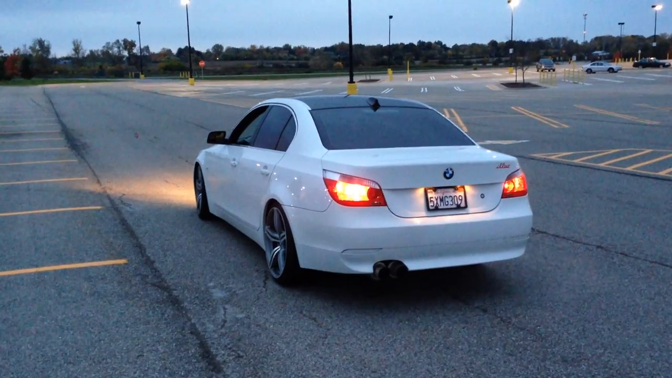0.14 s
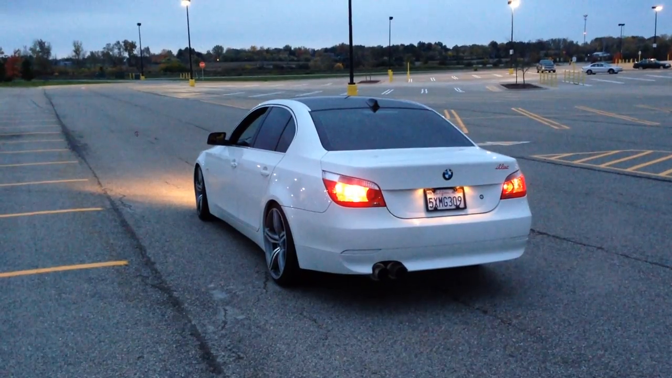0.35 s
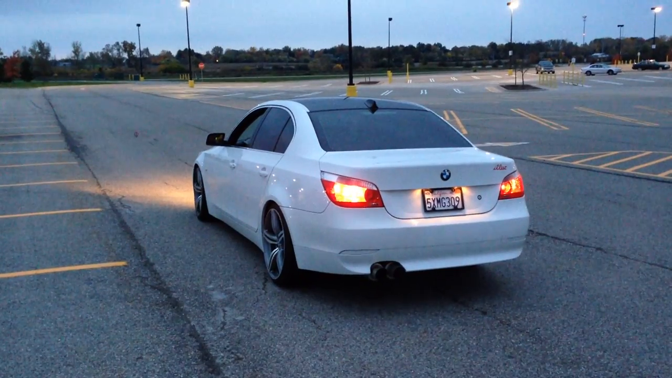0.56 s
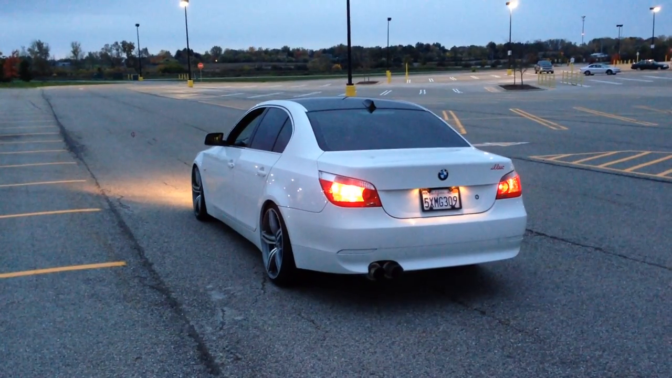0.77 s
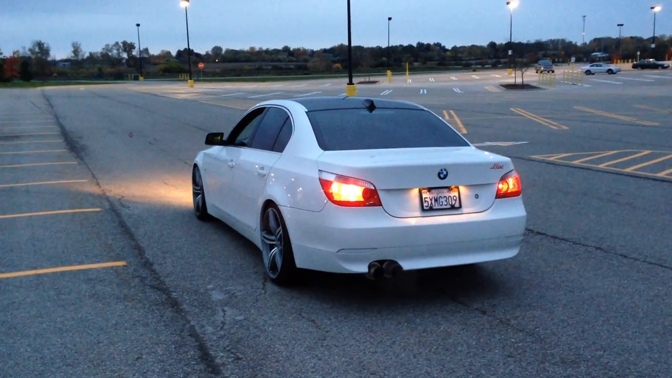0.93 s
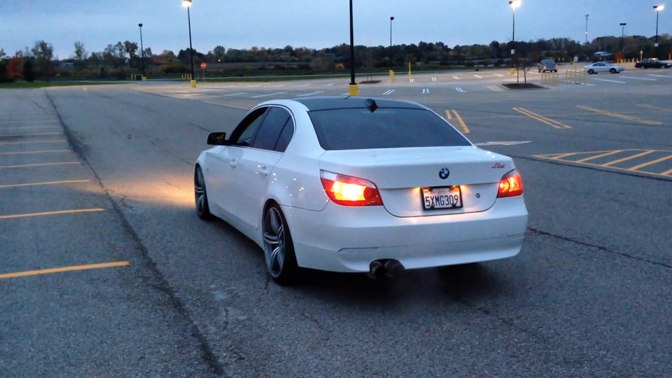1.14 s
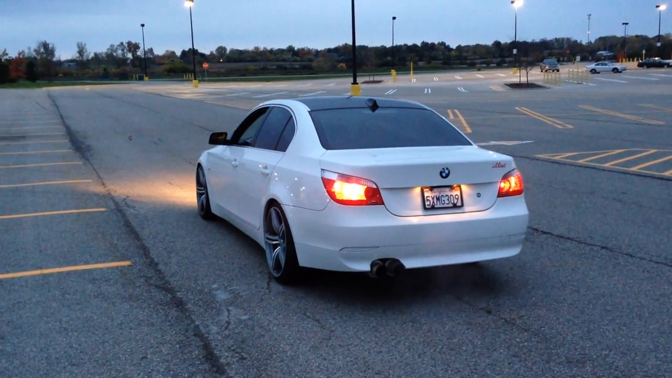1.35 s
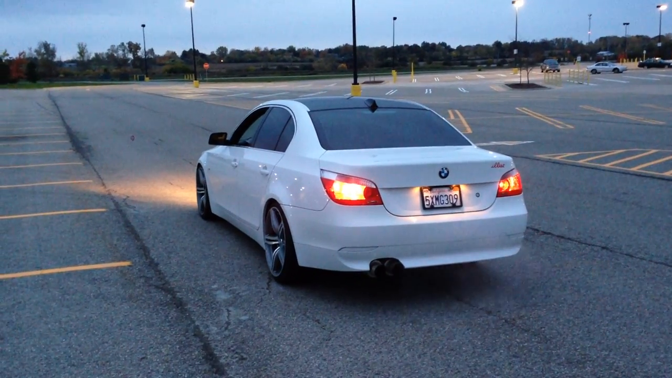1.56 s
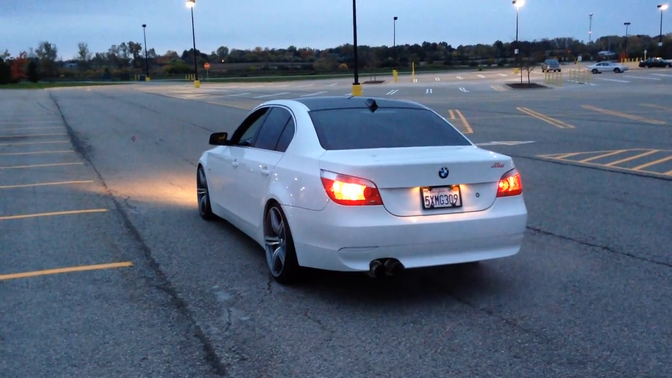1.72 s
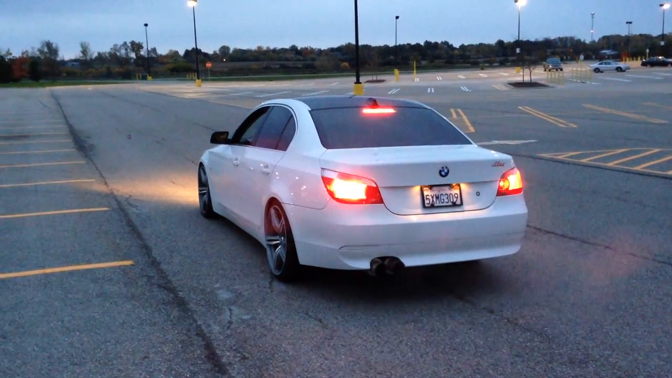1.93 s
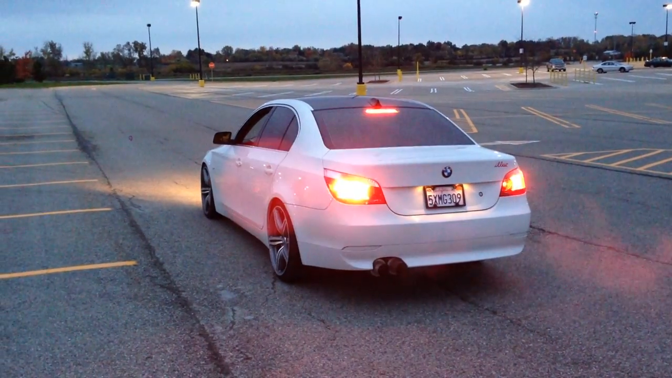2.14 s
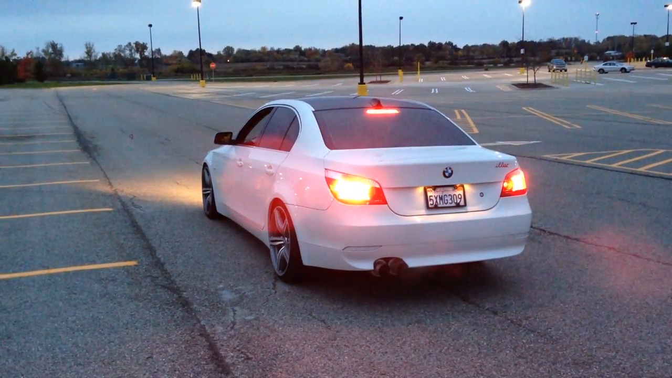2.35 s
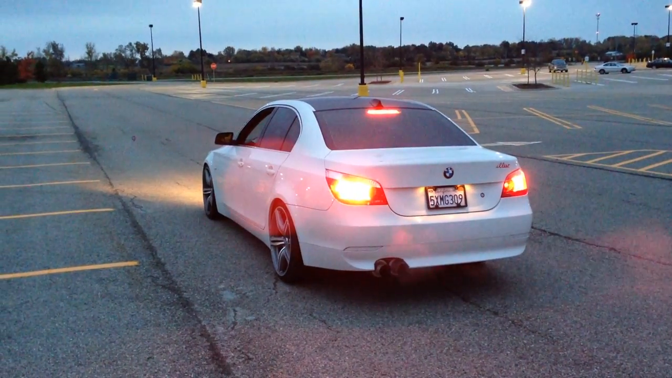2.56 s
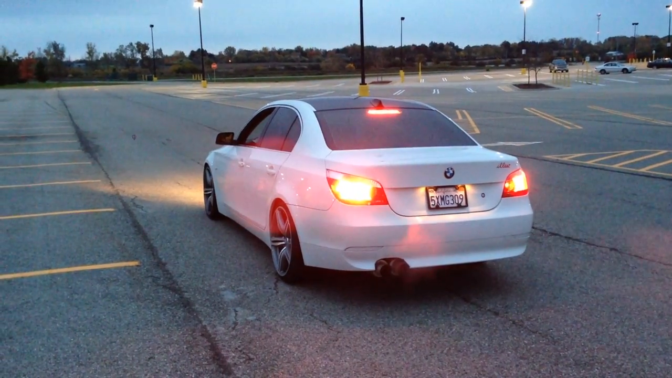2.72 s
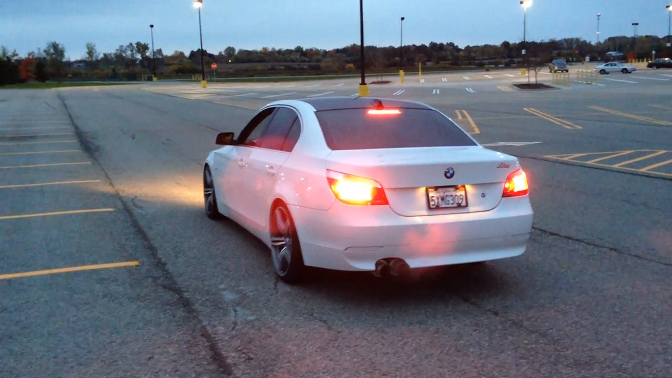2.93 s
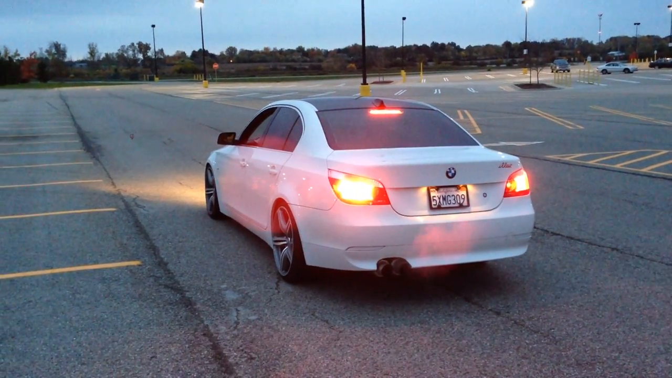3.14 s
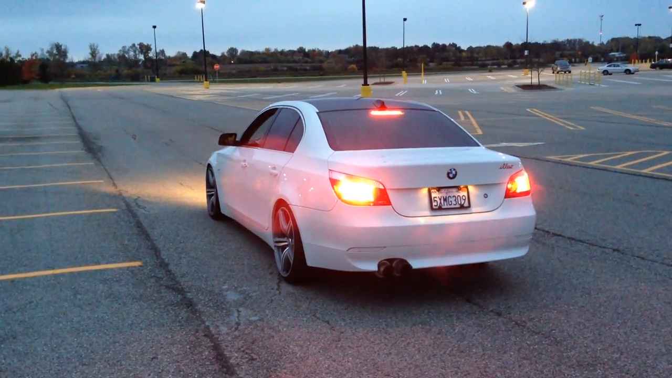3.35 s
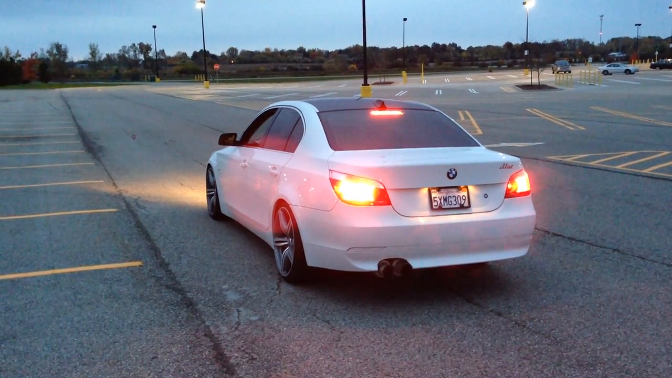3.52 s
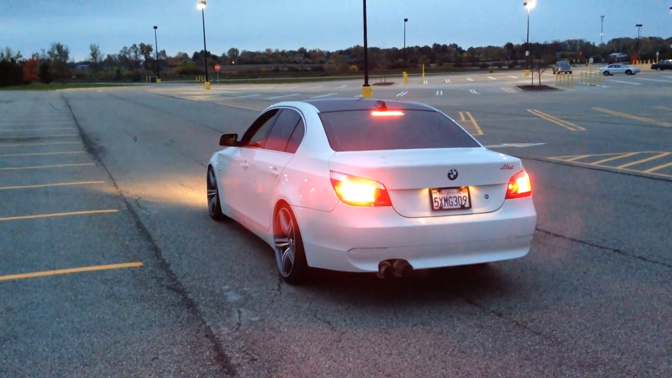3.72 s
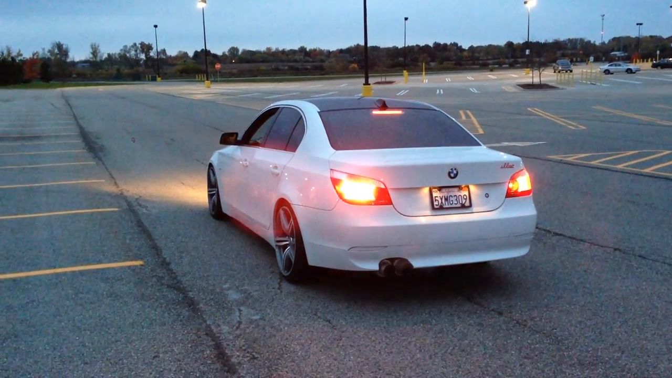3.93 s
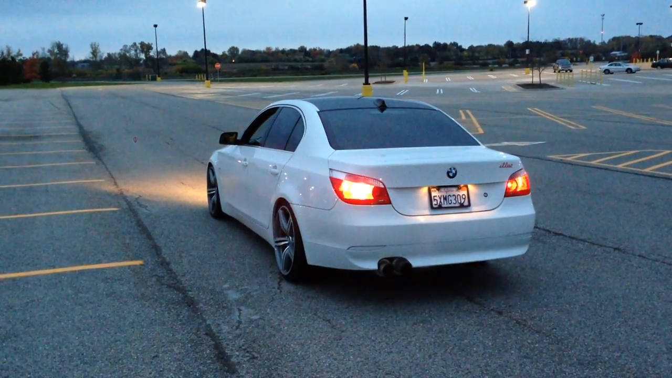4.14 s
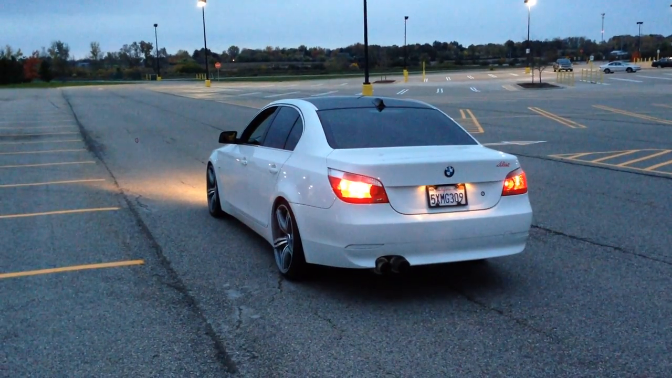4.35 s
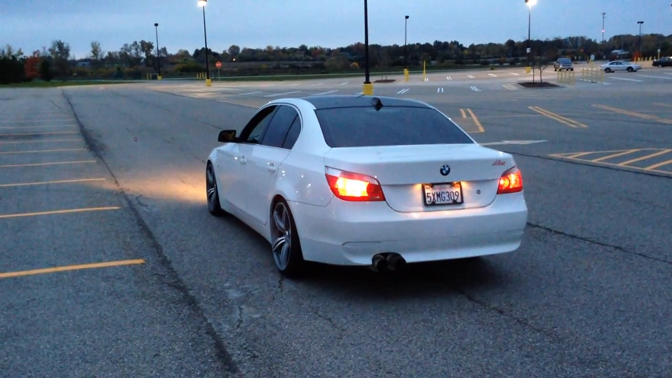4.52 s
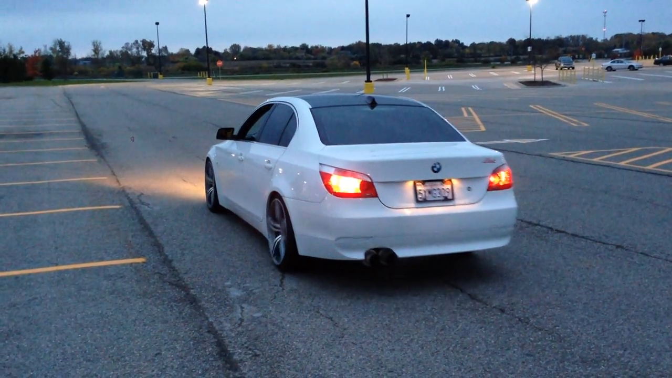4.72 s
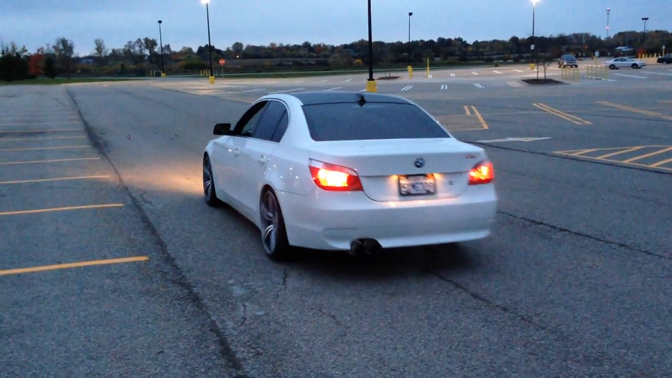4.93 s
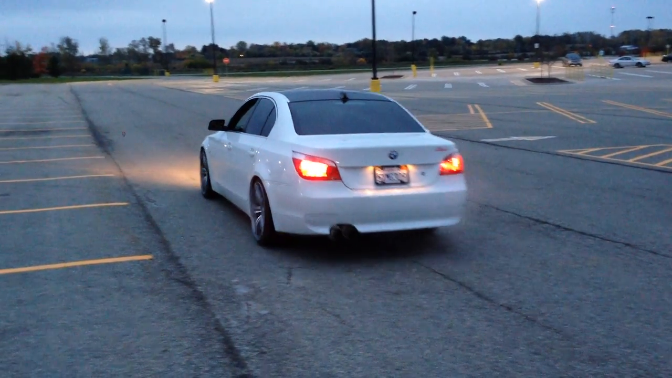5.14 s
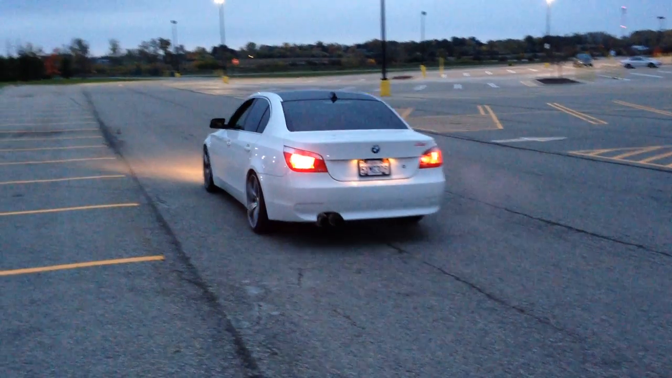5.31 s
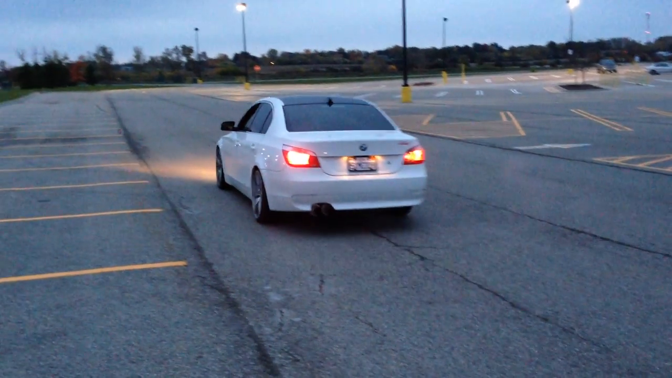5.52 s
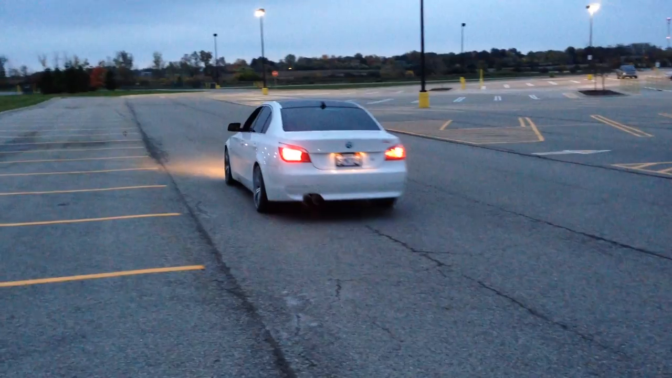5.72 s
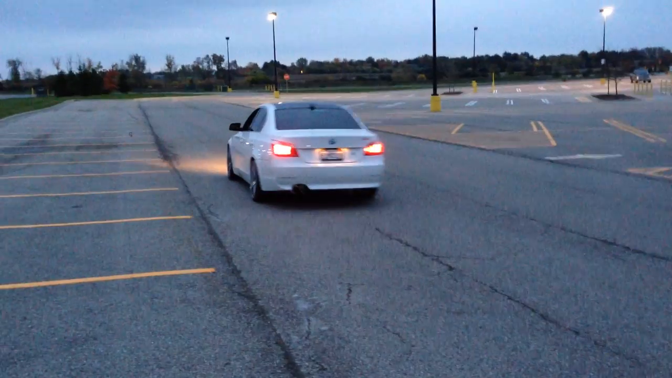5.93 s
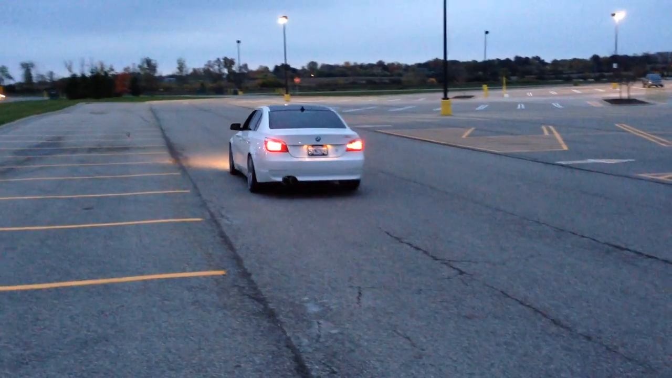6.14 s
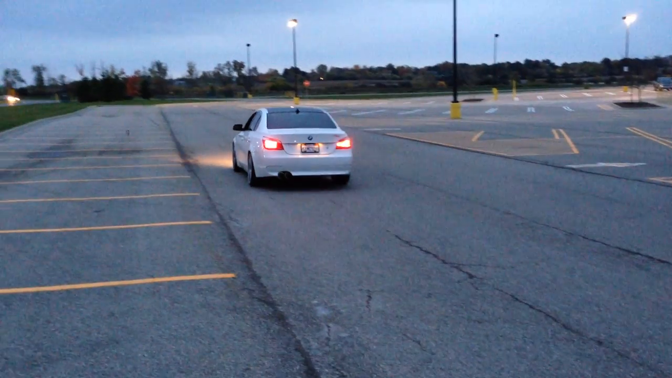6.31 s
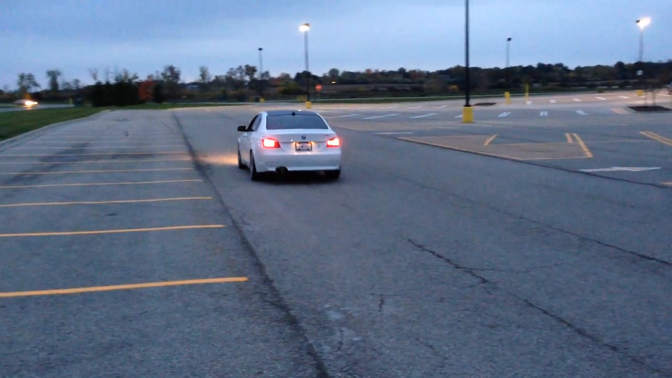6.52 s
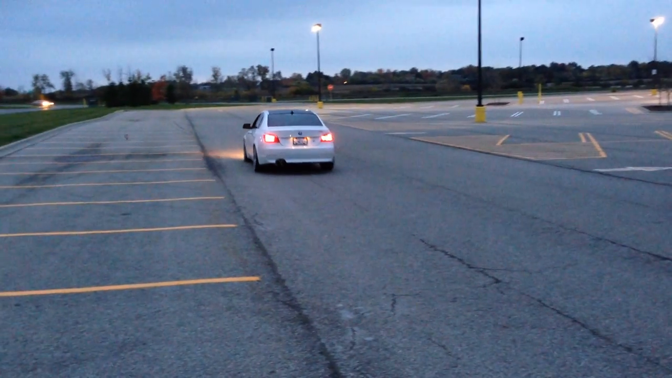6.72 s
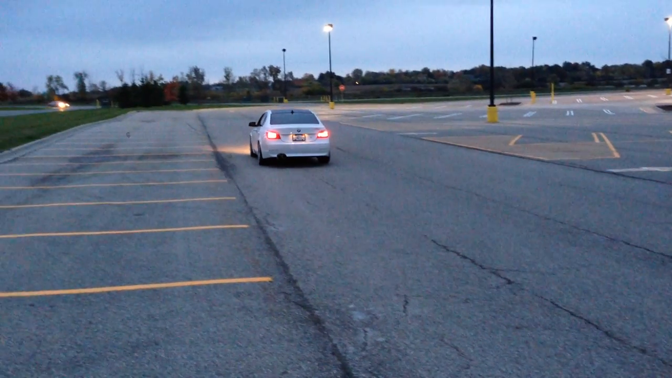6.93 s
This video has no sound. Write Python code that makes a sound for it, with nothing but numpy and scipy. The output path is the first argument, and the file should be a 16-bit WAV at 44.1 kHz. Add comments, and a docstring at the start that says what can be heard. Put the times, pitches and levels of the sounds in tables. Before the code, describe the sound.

A deep exhaust note drops, then leaps up in a brief throttle blip and descends slowly with burbling to idle. After a soft brake scuff and quiet pump hum, the car launches with strong boom, tyre grit and rasp, its pitch rising steadily until the throttle lifts. The single microphone stands behind the car in an open lot, with loud booms slightly squashed and faint far traffic.

```python
"""Empty parking lot: a straight-six car with an open exhaust drops from one blip, revs again, idles while
a gear is engaged, then pulls away and lifts off. Two banks of three cylinders fire into one booming pipe:
engine orders are sines, uneven burns and rasp are pulse trains ringing resonances. Gas, tyres, belts, scuffs
and far traffic are shaped noise; a pump hum and a faint whine are sines."""
import sys
import numpy as np
from scipy import signal
from scipy.fft import rfft, irfft
from scipy.io import wavfile
from scipy.ndimage import uniform_filter1d, minimum_filter1d

SR = 44100
rng = np.random.default_rng(int(sys.argv[2]) if len(sys.argv) > 2 else 0)


def bounce(signal):
    """Save signal as a 16-bit WAV file at the path given by the first command-line argument."""
    frames = np.transpose(np.atleast_2d(signal))
    limited = np.clip(frames, -1, 1)
    pcm = np.round(limited * 32767).astype(np.int16)
    wavfile.write(sys.argv[1], SR, pcm)


N = 311787
TIME_S = np.arange(N) / SR


def amp(db):
    """Amplitude ratio of a level in dB."""
    return 10 ** (np.asarray(db) / 20)


def rms_one(x):
    """Scale to rms 1."""
    return x / np.sqrt(np.mean(x ** 2) + 1e-20)


def in_time(rows):
    """Columns of a table whose first column is time, interpolated to every sample."""
    s, *columns = np.transpose(rows)
    return [np.interp(TIME_S, s, c) for c in columns]


def seconds_after(start_s):
    """Time since start_s, 0 before it."""
    return np.maximum(TIME_S - start_s, 0)


def drift(corner_hz):
    """Slow chance of spread 1: noise through a double one-pole low-pass."""
    pole = np.exp(-80 * np.pi * corner_hz / SR)   # runs at SR / 40
    noise = rng.standard_normal(N // 40 + 2002)
    slow = signal.lfilter([1], [1, -2 * pole, pole ** 2], noise)[2000:]   # settled part
    return np.interp(np.arange(N) / 40, np.arange(len(slow)), rms_one(slow))


def coloured(spectrum):
    """Noise of rms 1 with the given relative spectrum."""
    hz = np.fft.rfftfreq(N, 1 / SR) + 1
    at_hz, level_db = np.transpose(spectrum)
    gain = amp(np.interp(np.log(hz), np.log(at_hz), level_db, -90, -90))
    return rms_one(irfft(rfft(rng.standard_normal(N)) * gain, N))


def resonances(modes, hz):
    """Complex response of resonances in parallel, signs alternating."""
    total = 0
    for k, (centre_hz, width_hz, level_db) in enumerate(modes):
        detuning = (hz / centre_hz - centre_hz / hz) * centre_hz / width_hz
        total = total + (-1) ** k * amp(level_db) / (1 + 1j * detuning)
    return total


def ring(pulses, response):
    """Pass pulses through a response of hz; 1 s of padding keeps the tail from wrapping."""
    hz = np.fft.rfftfreq(N + SR, 1 / SR) + 1
    return irfft(rfft(pulses, N + SR) * response(hz))[:N]


# exhaust resonances: (centre [Hz], width [Hz], level [dB])
PIPE_MODES = [(55.5, 167, -11), (105.8, 22, 4), (172.8, 6.7, -3), (246.8, 44.6, -3), (310, 130, -14.5)]
SILENCER_HZ = 320


def pipe(hz):
    """The exhaust's resonances, shut off steeply above the silencer's corner."""
    x = hz / SILENCER_HZ
    return resonances(PIPE_MODES, hz) / (1 + 1.2j * x - x ** 2) ** 3


# engine speed before smoothing: (time [s], rate [firings/s])
SPEED = [(0, 83.4), (0.31, 57.9), (0.39, 53.8), (0.61, 47.6), (0.72, 47.6), (0.8, 52.5), (0.87, 61.5),
         (1.04, 93), (1.3, 154.3), (1.4, 169.7), (1.5, 168.4), (1.58, 163.2), (1.79, 142.3), (2.3, 96.3),
         (2.6, 71.1), (2.79, 55.1), (2.9, 53.9), (3.13, 45.8), (3.5, 38.4), (3.86, 34.6), (4.0, 35.6),
         (4.39, 36.4), (4.54, 40.2), (4.63, 49.1), (4.82, 78.3), (4.96, 94.4), (5.08, 101.8), (5.38, 111.7),
         (5.45, 116.1), (5.97, 158.5), (6.18, 177), (6.44, 198.5), (6.77, 220.7), (6.83, 223.3),
         (7.07, 182)]


def firing_rate():
    """Firings per s, smoothed so that every change is rounded."""
    return uniform_filter1d(in_time(SPEED)[0], size=2600, mode="nearest")


# gas pulses at the tailpipe: (time [s], pulse level [dB], imbalance of the banks [dB],
# sharpness [dB per octave of order], uneven burns [dB re pulse level])
GAS_PULSES = [(0, -1.5, -9.5, -1.5, -31.5), (.15, 0, -6, -7.5, -33.5), (.3, -14, 2, -4, -23),
              (.5, -23, -7.5, 4.5, -25), (.65, -19, 0, -1.5, -27.5), (.8, -11.5, -16, 4, -30.5),
              (.9, 3.5, -18.5, -1, -28), (.97, -0.5, 4, -2.5, -19), (1.02, -3.5, 0, 4, -20.5),
              (1.06, 5, -2.5, 0, -32), (1.2, 3, -10.5, -2.5, -19), (1.35, -2, 7.5, 2, -39.5),
              (1.42, -6, 8.5, -1.5, -20), (1.48, -17.5, 12, -9.5, -12.5), (1.55, -12, 14, -8, -13.5),
              (1.62, -6.5, 6, 2.5, -22.5), (1.85, -11, -2, 2, -20), (2.1, -6, -3.5, -5.5, -21.5),
              (2.35, -6.5, -2.5, -2, -26.5), (2.55, -1.5, -14, -5.5, -36.5), (2.82, -22.5, -10, 2.5, -17.5),
              (3.1, -24.5, -18, 6, -20.5), (3.16, -17.5, -5, 0, -37), (3.35, -16, 0.5, -3, -33.5),
              (3.6, -9, -11, 1.5, -32.5), (3.78, -10.5, -5, -1.5, -38.5), (4.05, 0, -22, -2.5, -43.5),
              (4.5, -9, -13, 2.5, -39.5), (4.68, 1.5, -12, 1.5, -32.5), (4.82, 9, -9, -2, -25.5),
              (4.97, 7.5, -3, -2, -33.5), (5.15, 0, -2, 0.5, -52), (5.45, -0.5, -2.5, -4, -30),
              (5.7, -3, -4, -1.5, -29), (6, -1.5, 5, -9, -32), (6.25, -1.5, -0.5, -4.5, -29),
              (6.45, -1.3, 1.5, -0.5, -32.5), (6.8, -10.5, 10.5, -4, -19.5), (6.95, -7, 3, 0.5, -29),
              (7.07, -3.5, -7, -1, -23.5)]


def gas_pulses():
    """Pulse level, bank imbalance, sharpness and unevenness at every sample."""
    return in_time(GAS_PULSES)


# throttle: (opens [s], shuts [s])
THROTTLE = [(0.902, 1.1), (4.58, 6.9)]


def throttle():
    """0 shut, 1 open; pipe pressure builds gradually."""
    is_open = sum(1. * (TIME_S > opens_s) * (TIME_S < shuts_s) for opens_s, shuts_s in THROTTLE)
    return uniform_filter1d(is_open, size=5000)


IN_GEAR_S, TURNS_AWAY_S = 4.5, 0.46   # start and duration of the change from standing to leaving
# how the exhaust passes a steady tone to the listener:
# (pitch [Hz], car standing [dB], car pulling away [dB])
PASSAGE = [(20, -50, -38.5), (32, -47.5, -43), (45, -32.5, -21), (59.7, -21.5, -12.5), (77.7, -20, -24.5),
           (91.5, -5, -11), (101, -4, -5), (116, -4, -3), (161, -6.5, -9.5), (185.7, -12, -12),
           (225, -7.5, -6.5), (265, -2.5, -4.5), (279.3, -3.5, -7.5), (330, -12, -14), (387, -28.5, -18.5),
           (453, -29.5, -17), (528, -18.5, -7), (630, -25.5, -17), (790, -34, -25), (1300, -33.5, -33)]
# engine orders; half orders come from unequal banks: (multiple of firing rate [1], level [dB])
ORDERS = [(.5, -9.5), (1, -9), (1.5, -19.5), (2, -18.5), (2.5, -22), (3, -26), (3.5, -35.5), (4, -32.5),
          (4.5, -35), (5, -43), (5.5, -48), (6, -47), (6.5, -65), (7, -50.5), (8, -60.5)]
# the lowest half order thins under throttle and grows with speed
LOPE_OPEN_DB, LOPE_DB_PER_OCTAVE = -6.5, 11.5


def exhaust_tones(rate, firings, pulse_db, imbalance_db, sharp_db, wobble_db=0.99):
    """Engine orders as sines; each takes the level that the exhaust passes at its pitch and the pipe's phase."""
    step = np.arange(0, N, 64)
    smooth = lambda v: np.interp(np.arange(N), step, v)
    at_hz, standing_db, leaving_db = np.transpose(PASSAGE)
    passed = lambda hz, db: np.interp(np.log(hz), np.log(at_hz), db)
    away = np.clip((step / SR - IN_GEAR_S) / TURNS_AWAY_S, 0, 1)
    out = 0
    for order, order_db in ORDERS:
        hz = order * rate[step]
        passed_db = (1 - away) * passed(hz, standing_db) + away * passed(hz, leaving_db)
        level_db = order_db + pulse_db + sharp_db * np.log2(max(order, 1)) + smooth(passed_db)
        if order % 1 > 0:
            level_db = level_db + imbalance_db
        if order < 1:
            lope_speed_db = LOPE_DB_PER_OCTAVE * np.log2(rate / rate.max())
            level_db = level_db + LOPE_OPEN_DB * throttle() + lope_speed_db
        gain = amp(level_db + wobble_db * drift(18.0))
        pipe_phase = smooth(np.unwrap(np.angle(pipe(hz))))
        out = out + np.sqrt(2) * gain * np.cos(2 * np.pi * order * firings + pipe_phase)
    return out


RUMBLE_FLOOR_DB, RUMBLE_DB_PER_OCTAVE = -54.5, -6.5   # floor at mean speed; it thins at speed
BOOM_HZ, BOOM_OCTAVES = 102, 0.15
BOOM_DB, HALF_BOOM_DB = -30.5, -41   # re pulse level plus load
IN_GEAR_DB = 6   # the boom rumbles harder against the load


def rumble_level(rate, pulse_db):
    """Level in dB: a floor, lifted where the firing rate, or half of it, meets the boom of the pipe."""
    near = lambda hz: np.exp(-.5 * (np.log2(hz / BOOM_HZ) / BOOM_OCTAVES) ** 2)
    load_db = pulse_db + IN_GEAR_DB * (TIME_S > IN_GEAR_S)
    boom = amp(load_db) * (amp(BOOM_DB) * near(rate) + amp(HALF_BOOM_DB) * near(rate / 2))
    floor_db = RUMBLE_FLOOR_DB + RUMBLE_DB_PER_OCTAVE * np.log2(rate / rate.mean())
    return 20 * np.log10(amp(floor_db) + boom)


BURN_LOW_HZ = 73   # the pipe radiates little of the uneven burns below this


def uneven_burns(rate, firings, burn_db, rumble_db, lumps_db=2.3, rumble_hz=68.5):
    """Burns stray from the mean; the surplus, as random pulses, rings the pipe and thuds below it."""
    at = np.flatnonzero(np.diff(np.floor(2 * firings)))   # valve opening and closing
    pulses = np.zeros(N)
    pulses[at] = rng.standard_normal(len(at)) / np.sqrt(rate[at])
    pulses *= amp(lumps_db * drift(3.5))
    rung = ring(pulses, lambda hz: pipe(hz) / (1 + BURN_LOW_HZ / (1j * hz)) ** 2)
    thud_band = signal.butter(2, [34., rumble_hz], "band", fs=SR, output="sos")
    thud = signal.sosfilt(thud_band, pulses)
    return amp(burn_db) * rms_one(rung) + amp(rumble_db) * rms_one(thud)


# gas rush, relative spectrum: (frequency [Hz], density [dB per Hz])
GAS_SPECTRUM = [(1650, -21.5), (2800, -5), (3010, -7), (3230, -3), (4000, 2), (5130, -2.5), (5880, -8.5),
                (7020, -8), (8210, -10.5), (8880, -16.5), (10100, -15), (11800, -23.5), (14600, -31),
                (15400, -31)]
# level at 100 firings/s, rise with speed, share of the pulse level followed
GAS_DB, GAS_DB_PER_OCTAVE, GAS_FOLLOWS = -59, 8.5, 0.05
OPEN_HISS_DB = 1.5   # lift by an open throttle
LEAVES_S, GAS_FADE_DB_PER_S = 5.7, 3   # fades as the car draws away


def gas_rush(rate, firings, pulse_db, puff_depth=0.059):
    """Gas leaving the tailpipe hisses, grows with speed and pulses a little with each firing."""
    level_db = GAS_DB + GAS_DB_PER_OCTAVE * np.log2(rate / 100) + GAS_FOLLOWS * pulse_db
    level_db += OPEN_HISS_DB * throttle() - GAS_FADE_DB_PER_S * seconds_after(LEAVES_S)
    puff = 1 + puff_depth * np.cos(2 * np.pi * firings)
    return puff * amp(level_db + 0.66 * drift(16.0)) * coloured(GAS_SPECTRUM)


# tyre and body roar, relative spectrum: (frequency [Hz], density [dB per Hz])
ROAR_SPECTRUM = [(240, -26.5), (400, 5), (710, -3.5), (1060, -3), (1160, -4.5), (1390, -1.5), (2380, -4.5),
                 (2770, -11), (2940, -34), (3100, -16), (4030, -53), (6820, -120)]
# level at 100 firings/s, rise with speed, share of the pulse level followed
ROAR_DB, ROAR_DB_PER_OCTAVE, ROAR_FOLLOWS = -53, 11, 0.12


def roar(rate, pulse_db):
    """Tyres and body roar smoothly, louder with engine speed."""
    level_db = ROAR_DB + ROAR_DB_PER_OCTAVE * np.log2(rate / 100) + ROAR_FOLLOWS * pulse_db
    return amp(level_db + 0.9 * drift(16.0)) * coloured(ROAR_SPECTRUM)


# engine bay, relative spectrum: (frequency [Hz], density [dB per Hz])
WHIRR_SPECTRUM = [(1300, -9.5), (1550, -3), (1900, -16.5), (2300, 3), (2750, -11.5)]
WHIRR_DB, WHIRR_DB_PER_OCTAVE = -56.5, 7.4   # level at mean speed, rise with speed
WHIRR_FADE_S, WHIRR_FADE_DB_PER_S = 3.84, 13


def whirr(rate):
    """Belts and valve gear rustle with speed and are lost as the car leaves."""
    level_db = WHIRR_DB + WHIRR_DB_PER_OCTAVE * np.log2(rate / rate.mean())
    return amp(level_db - WHIRR_FADE_DB_PER_S * seconds_after(WHIRR_FADE_S)) * coloured(WHIRR_SPECTRUM)


# far traffic over the lot, relative spectrum: (frequency [Hz], density [dB per Hz])
LOT_SPECTRUM = [(190, -24.5), (330, 0), (375, -2.5), (543, -3.5), (608, 2.5), (1030, 3), (1120, 1),
                (2160, -7), (2380, -9.5), (2940, -15.5), (4610, -20), (6460, -19.5), (14700, -20.5),
                (15400, -31)]
LOT_DB = -58


def far_traffic():
    """Steady shaped noise, its level drifting slightly."""
    return amp(LOT_DB + 0.36 * drift(12.0)) * coloured(LOT_SPECTRUM)


WHINE_HZ, WHINE_PEAK_DB = 5100, -82.5
WHINE_FADE_S, WHINE_FADE_DB_PER_S = 4.7, 16


def whine():
    """A faint sine of wavering level, lost as the car leaves."""
    level_db = WHINE_PEAK_DB + 3. * drift(4.) - WHINE_FADE_DB_PER_S * seconds_after(WHINE_FADE_S)
    return amp(level_db) * np.sin(2 * np.pi * WHINE_HZ * TIME_S)


# tailpipe rasp resonances: (centre [Hz], width [Hz], level [dB])
SHELL_MODES = [(468.5, 46, 4.5), (578.5, 111, -0.5), (744, 80, -1)]
RASP_SHUT_DB, RASP_OPEN_DB, RASP_FOLLOWS = -70.5, -45, .3   # last: share of the pulse level followed
RASP_DB_PER_OCTAVE = 39   # dies away below 100 firings/s


def rasp(rate, firings, pulse_db):
    """Sharp edges of the gas pulses, the two banks unequal, ring the tailpipe, loudest under throttle."""
    at = np.flatnonzero(np.diff(np.floor(firings)))
    bank = 1 + 1.02 * (-1) ** np.arange(len(at))
    scatter = 1.2 * rng.standard_normal(len(at))
    pulses = np.zeros(N)
    pulses[at] = (bank + scatter) / np.sqrt(rate[at])
    rung = ring(pulses, lambda hz: resonances(SHELL_MODES, hz) ** 2)
    level_db = RASP_SHUT_DB + (RASP_OPEN_DB - RASP_SHUT_DB) * throttle() + RASP_FOLLOWS * pulse_db
    level_db += RASP_DB_PER_OCTAVE * np.minimum(np.log2(rate / 100), 0)
    return amp(level_db) * rms_one(rung)


# single firings that stand out from their neighbours: (time [s], gain [dB])
STRONG_FIRINGS = [(0.966, 10), (1.057, 0), (1.079, 2), (1.157, 0.5), (1.184, 3.5), (1.548, 7.5),
                  (2.114, 5.5), (2.284, 3), (2.305, 6), (2.376, 6.5), (2.481, 9), (2.581, 9), (4.015, 13),
                  (4.07, 8), (4.183, 5.5), (4.293, -2), (4.682, 11.5), (4.714, 10), (4.791, 11),
                  (4.947, 6.5), (4.98, 5.5), (5.01, 11.5), (5.05, 0.5), (5.097, 5), (5.125, 5),
                  (5.155, 1.5), (5.214, 8), (5.231, 3), (5.31, 7.5), (5.411, 1), (5.427, 2), (5.46, 4.5),
                  (5.501, 3), (5.569, 5.5)]


def strong_firings(width_s=0.0027):
    """Gain on the exhaust tones: a short bell-shaped change at each listed firing."""
    t, boost_db = np.arange(0, N, 16) / SR, 0
    for s, gain_db in STRONG_FIRINGS:
        boost_db = boost_db + gain_db * np.exp(-.5 * ((t - s) / width_s) ** 2)
    return amp(np.interp(TIME_S, t, boost_db))


HUM_START_S, HUM_STOP_S, HUM_EDGE_S = 3.62, 4.62, 0.06
HUM_HZ, HUM_START_DB, HUM_SAG_DB_PER_S = 594, -62.5, 11.5


def pump_hum():
    """A pump hums while the gear is engaged: a sine with linear edges and sagging level."""
    running = np.clip(np.minimum(TIME_S - HUM_START_S, HUM_STOP_S - TIME_S) / HUM_EDGE_S, 0, 1)
    gain = running * amp(HUM_START_DB - HUM_SAG_DB_PER_S * (TIME_S - HUM_START_S))
    return np.sqrt(2) * gain * np.sin(2 * np.pi * HUM_HZ * TIME_S)


# scuffs of brake pads and of tyres on grit:
# (time of peak [s], dull part at peak [dB], bright part at peak [dB], rise [s], t60 [s])
SCUFFS = [(3.8, -62, -73, .02, .3), (3.875, -55, -75, .01, 0.29), (4.689, -61, -71, 0.0078, 0.23),
          (4.942, -52, -57.5, .06, 0.2), (5.046, -58, -53, 0.0087, 0.22)]
# bright part, relative spectrum: (frequency [Hz], density [dB per Hz])
GRIT_SPECTRUM = [(3000, -15), (4500, 1), (7000, -1.5), (9000, -9), (13000, -25)]


def scuffs():
    """Short swells of dull and bright noise: linear rise, exponential decay."""
    dull, bright = np.zeros(N), np.zeros(N)
    for s, dull_db, bright_db, rise_s, t60_s in SCUFFS:
        swell = amp(-60 * seconds_after(s) / t60_s) * np.clip(1 + (TIME_S - s) / rise_s, 0, 1)
        dull += amp(dull_db) * swell
        bright += amp(bright_db) * swell
    dull_spectrum = [(1200, -25.0), (1900, 1.5), (3000, -9.0), (4200, -8.5), (8000, -26.5)]
    return bright * coloured(GRIT_SPECTRUM) + dull * coloured(dull_spectrum)


# small metal ticks from the driveline and grit:
# (time [s], initial level before the band-pass [dB], nominal pitch [Hz], t60 [s])
TICKS = [(3.868, -51, 3500, .02), (4.679, -35.5, 1870, 0.024), (4.977, -50, 4940, 0.0084),
         (5.041, -41.5, 8000, 0.006), (5.065, -48, 6060, 0.0065)]


def ticks():
    """Dying noise bursts, band-passed around their pitch."""
    out, t = np.zeros(N), np.arange(4000) / SR
    for s, level_db, hz, t60_s in TICKS:
        band = signal.butter(2, [hz / 2, hz * 1.7], "band", fs=SR, output="sos")
        burst = rng.standard_normal(4000) * amp(level_db - 60 * t / t60_s)
        start = round(s * SR)
        out[start:start + 4000] += signal.sosfilt(band, burst)
    return out


def scene():
    """Car, its small noises and the lot, summed to one channel."""
    rate = firing_rate()
    firings = np.cumsum(rate) / SR   # running count
    pulse_db, imbalance_db, sharp_db, uneven_db = gas_pulses()
    car = strong_firings() * exhaust_tones(rate, firings, pulse_db, imbalance_db, sharp_db)
    car += uneven_burns(rate, firings, pulse_db + uneven_db, rumble_level(rate, pulse_db))
    car += gas_rush(rate, firings, pulse_db) + roar(rate, pulse_db) + whirr(rate)
    car += rasp(rate, firings, pulse_db)
    small = whine() + pump_hum() + scuffs() + ticks()
    return (car + small + far_traffic())[None]


LIMIT, CUTOFF_HZ = .745, 15450


def record(dry):
    """A limiter turns the loudest booms down, the top is cut."""
    gain = minimum_filter1d(np.minimum(1, LIMIT / (abs(dry) + 1e-9)), size=441)
    held = dry * uniform_filter1d(gain, size=441)
    return signal.sosfilt(signal.ellip(12, .5, 70, CUTOFF_HZ, fs=SR, output="sos"), held)


dry = scene()
out = record(dry)
bounce(out)
```